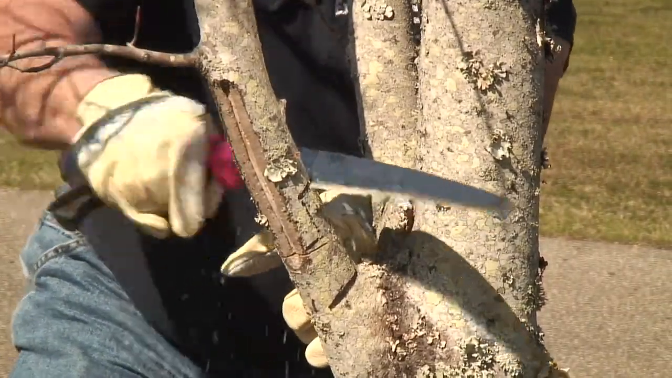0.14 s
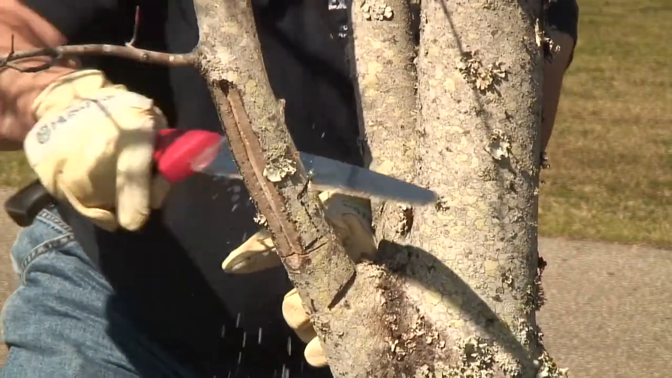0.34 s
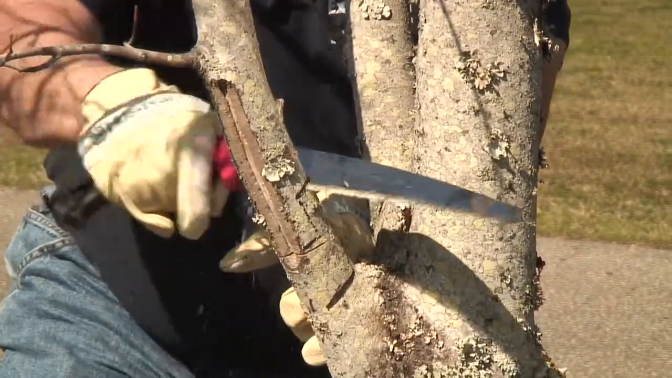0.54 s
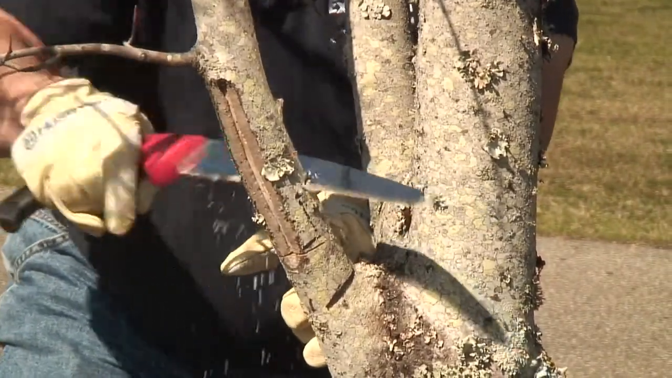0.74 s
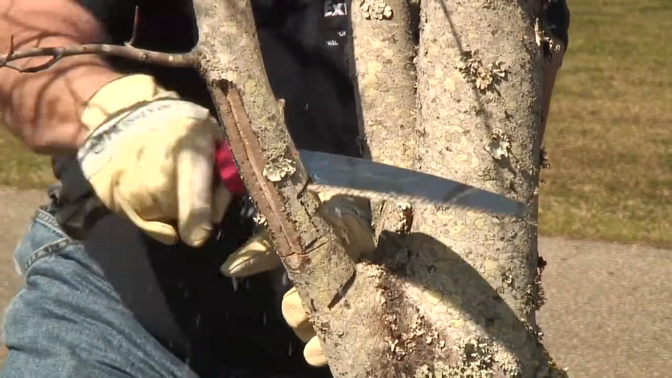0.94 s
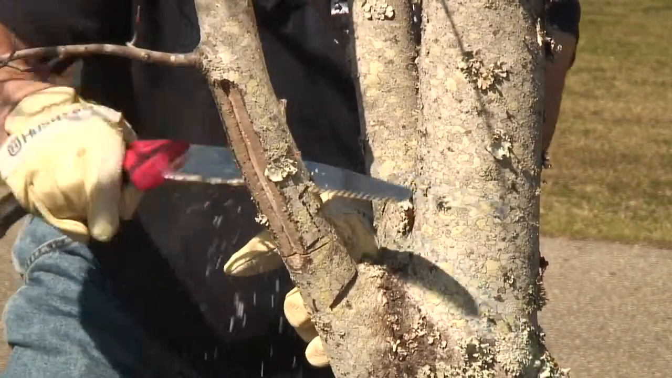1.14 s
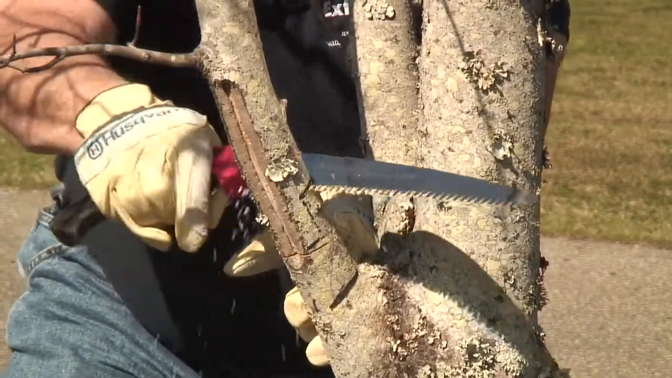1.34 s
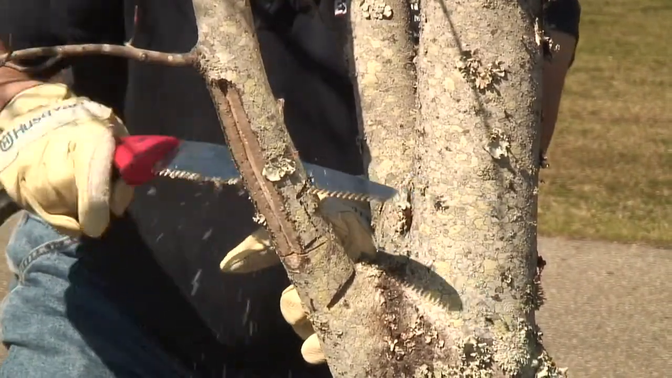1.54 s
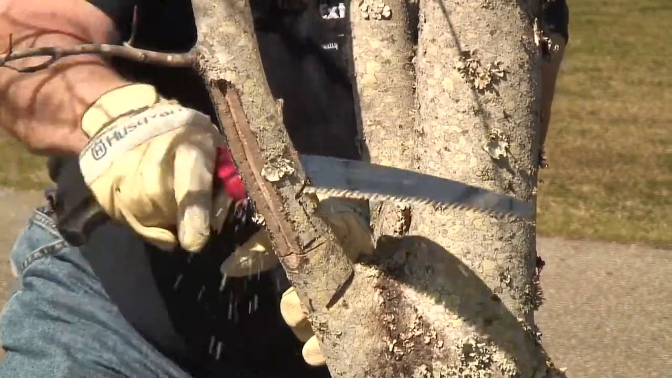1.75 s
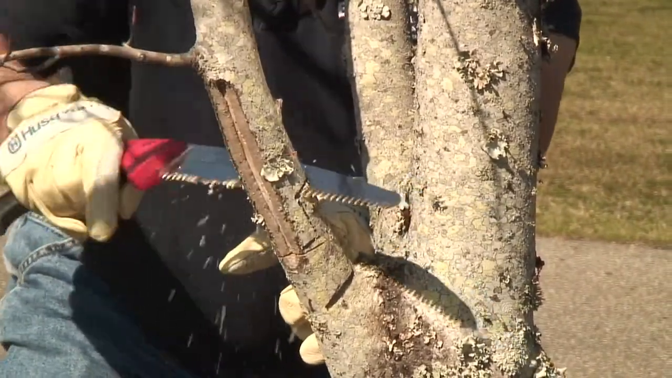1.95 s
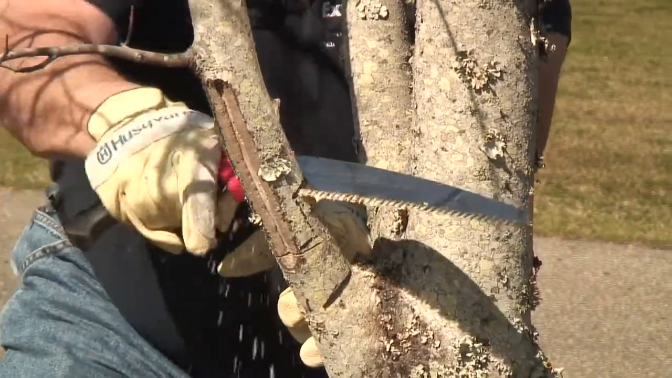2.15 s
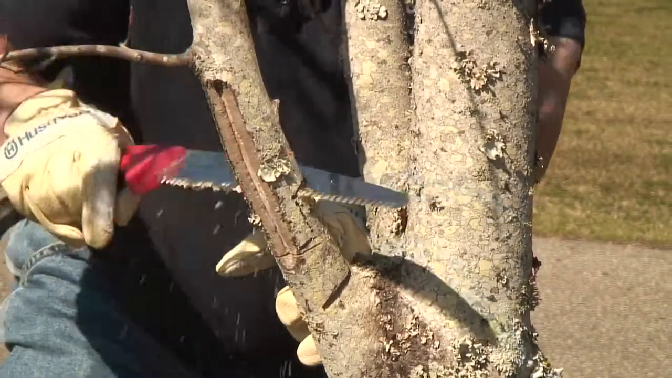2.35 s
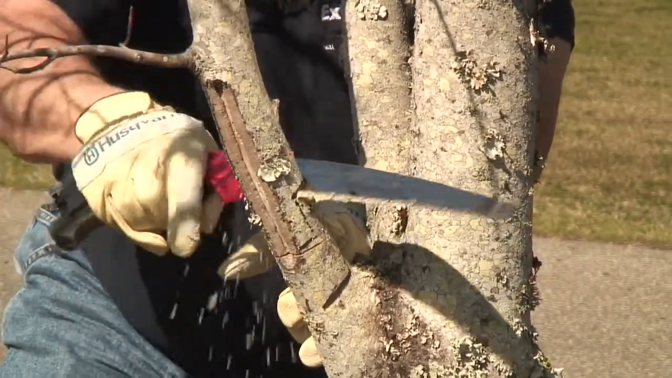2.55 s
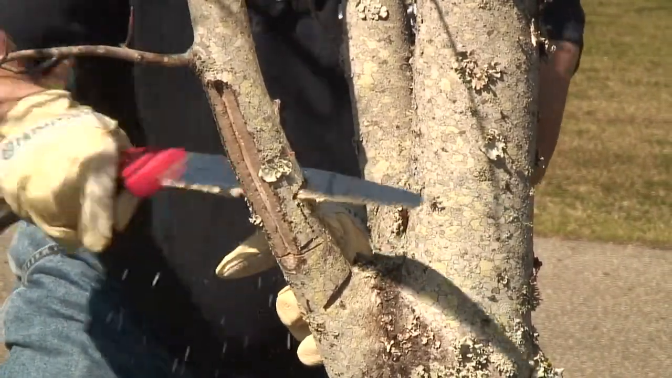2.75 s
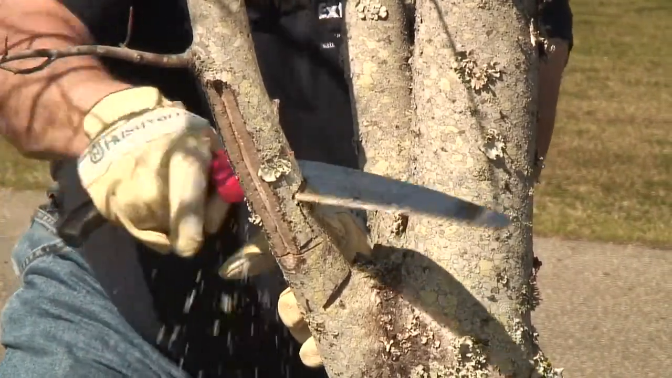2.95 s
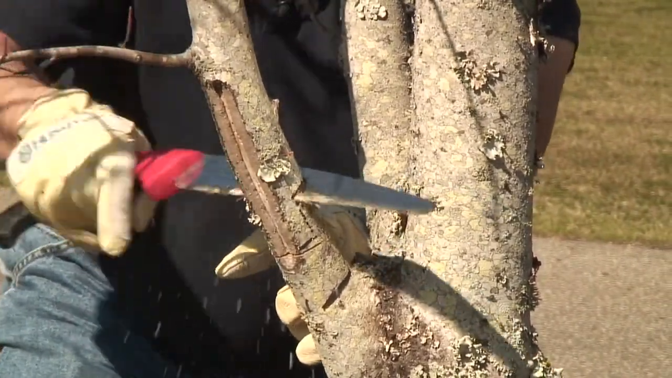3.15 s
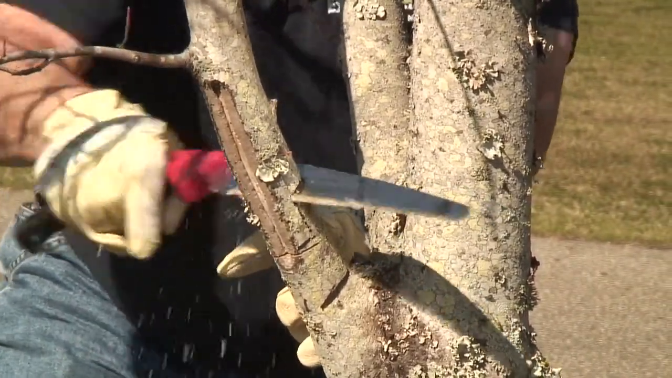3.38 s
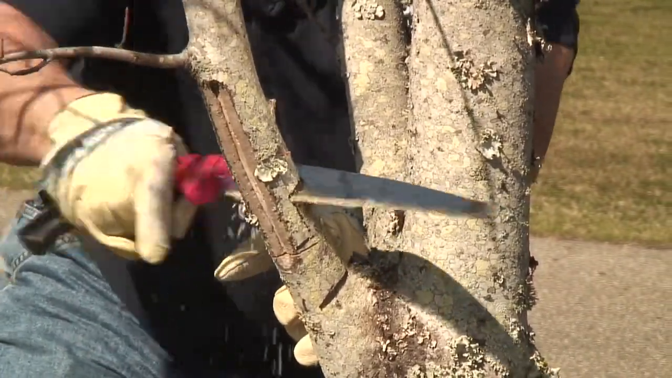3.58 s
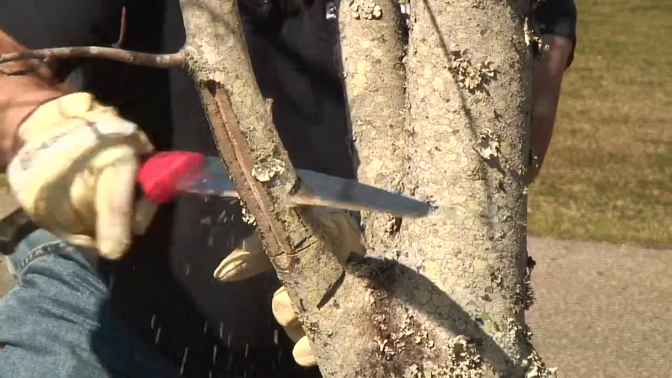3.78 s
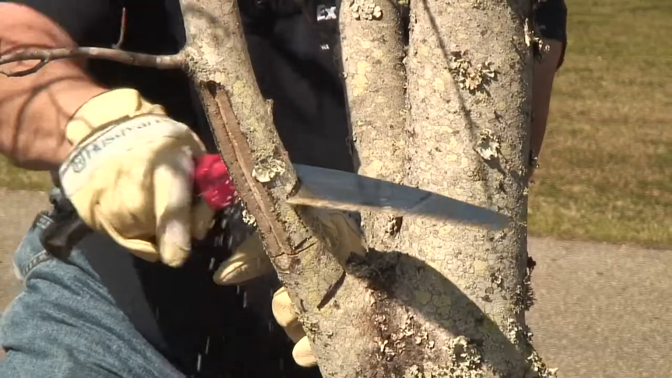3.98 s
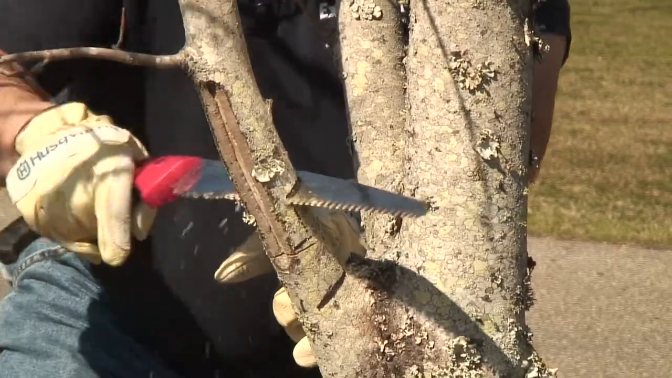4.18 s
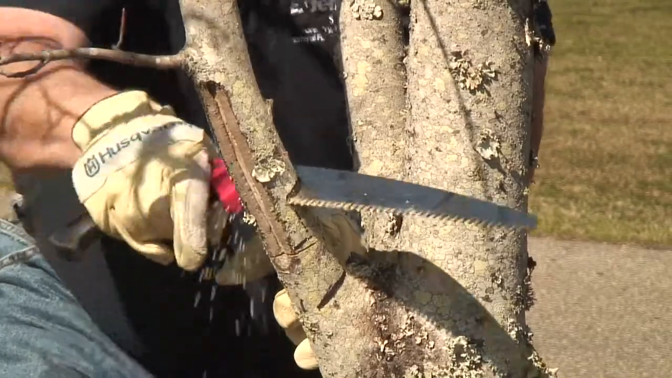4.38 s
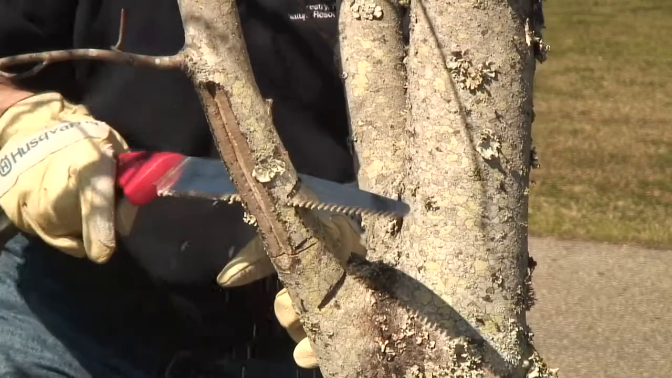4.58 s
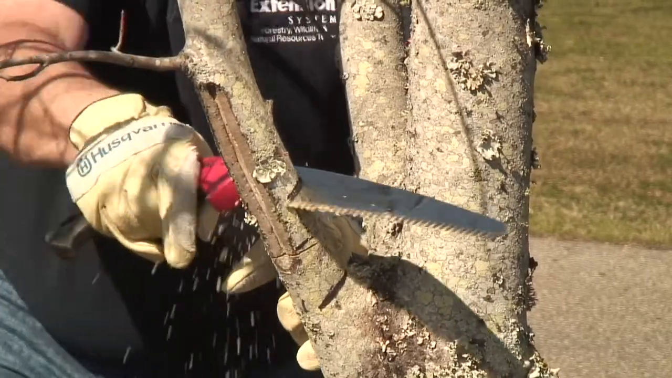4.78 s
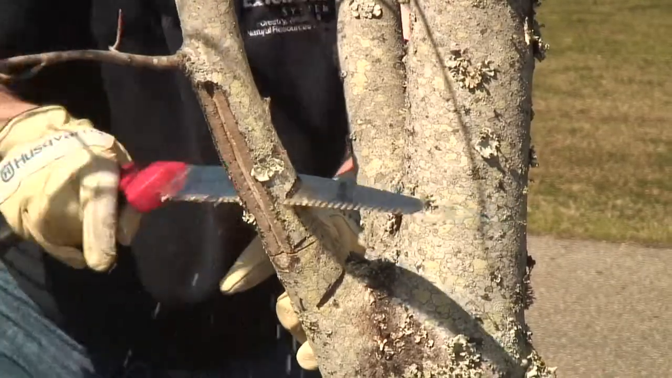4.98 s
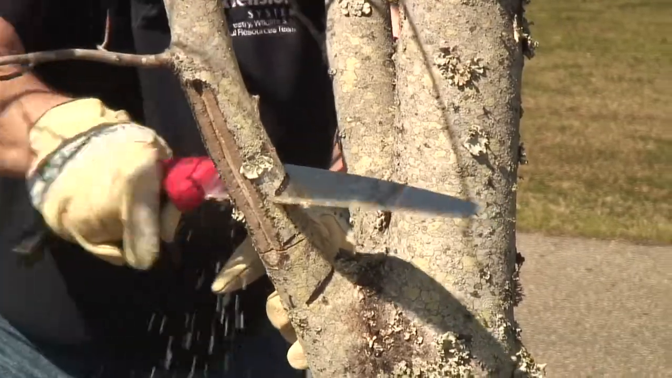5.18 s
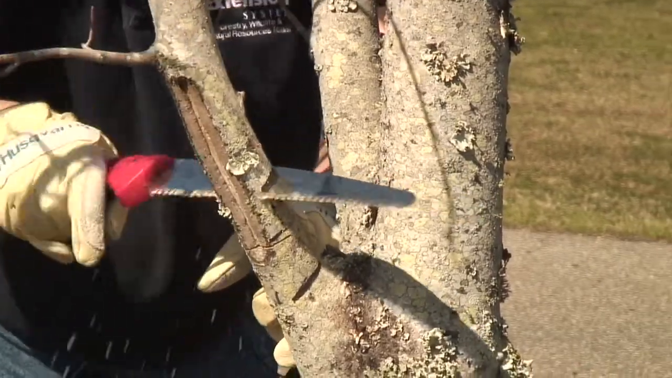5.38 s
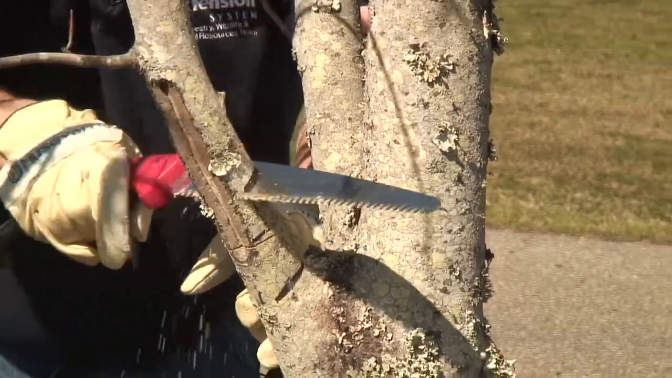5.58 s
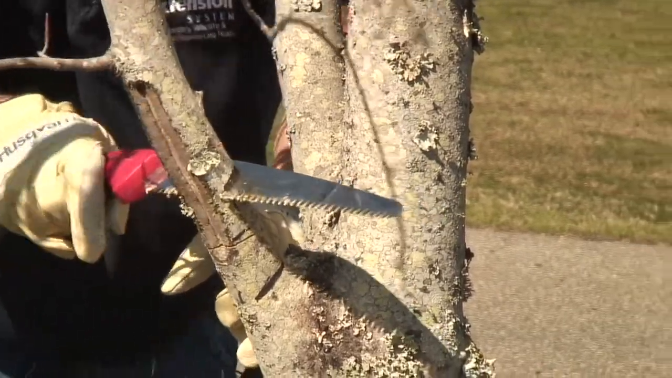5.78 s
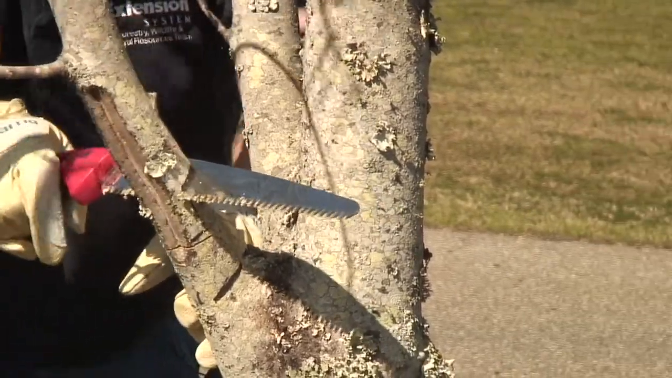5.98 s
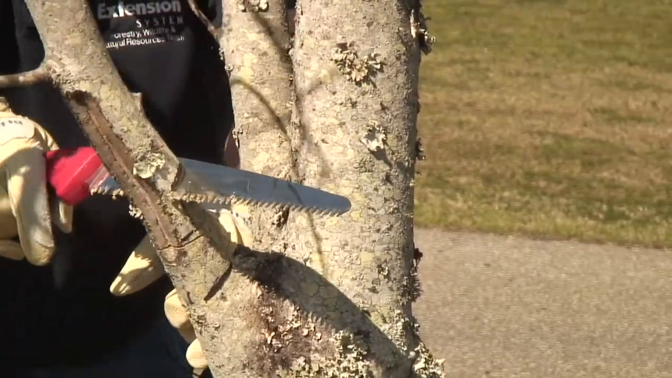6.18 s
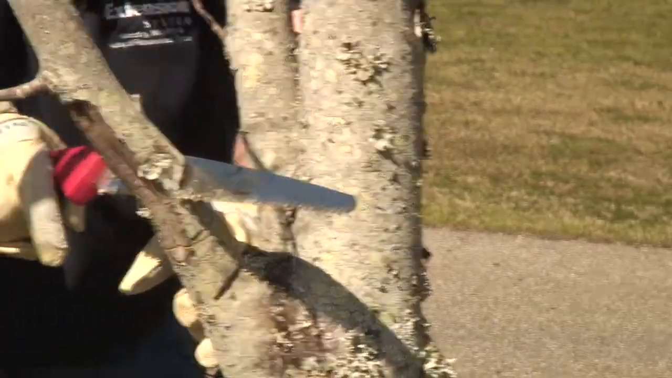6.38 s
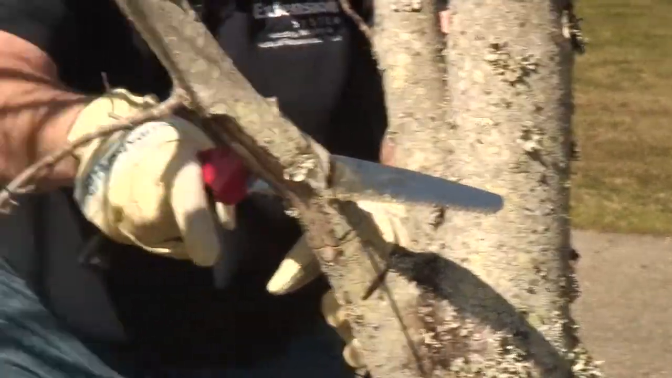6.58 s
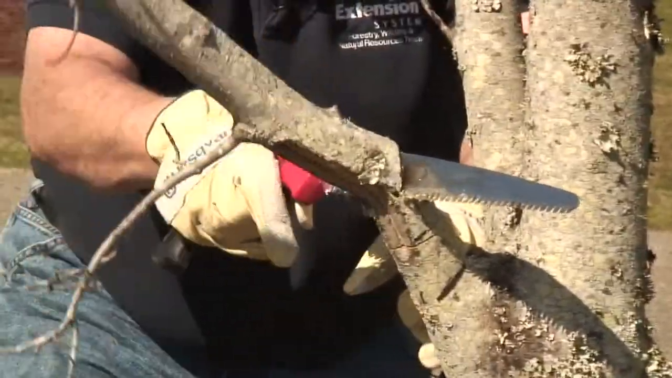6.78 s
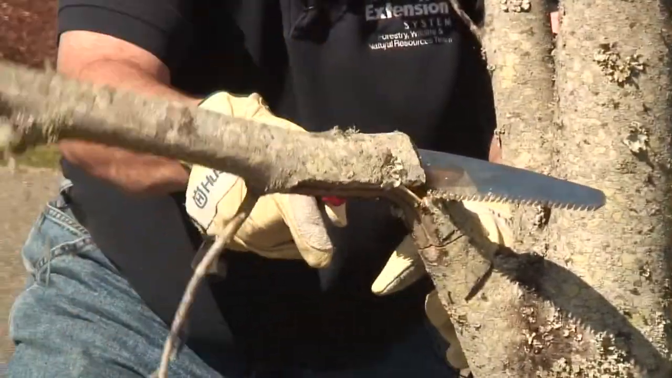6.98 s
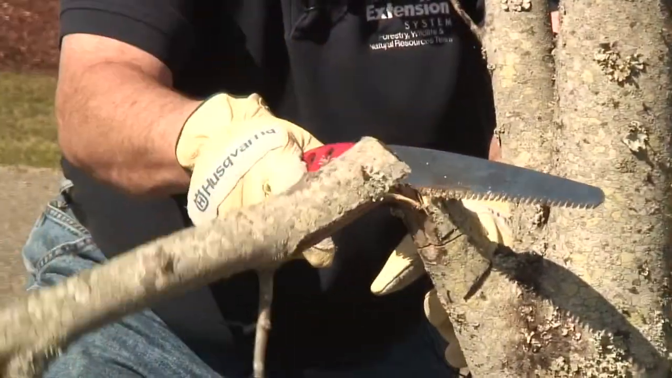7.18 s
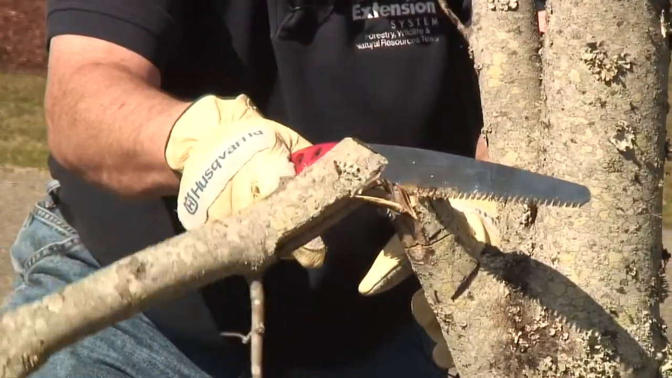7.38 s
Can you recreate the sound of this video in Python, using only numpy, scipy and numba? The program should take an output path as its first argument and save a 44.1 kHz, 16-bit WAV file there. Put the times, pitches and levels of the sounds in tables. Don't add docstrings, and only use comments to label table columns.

```python
import sys
import numpy as np
from scipy import signal
from scipy.fft import rfft, irfft
from scipy.io import wavfile
from scipy.ndimage import uniform_filter1d
from numba import njit

SR = 44100
rng = np.random.default_rng(int(sys.argv[2]) if len(sys.argv) > 2 else 0)


def file_out(sig):
    cols = np.atleast_2d(sig).T
    lim = np.clip(cols, -1, 1)
    pcm = np.round(lim * 32767).astype(np.int16)
    wavfile.write(sys.argv[1], SR, pcm)


def attenuation_scalar(level_db):
    decades = np.asarray(level_db, float) / 20
    return 10 ** decades


N = 327663


def unit(x):
    return x / np.sqrt(np.mean(x ** 2))


def colour(x, points):
    hz, db = np.transpose(points)
    grid = np.maximum(np.arange(1025) * SR / 2048, 1)
    log_gain = np.interp(np.log(grid), np.log(hz), db) * np.log(10) / 20
    cepstrum = irfft(log_gain)
    cepstrum[1:1024] *= 2
    cepstrum[1025:] = 0
    impulse = irfft(np.exp(rfft(cepstrum)))
    return signal.fftconvolve(x, impulse)[:len(x)]


@njit
def moving_band(x, hz, width):
    y, b, l = np.empty(len(x)), 0., 0.
    for i in range(len(x)):
        g, k = np.tan(np.pi * hz[i] / SR), width / hz[i]
        v = (b + g * (x[i] - l)) / (1 + g * (g + k))
        b, l, y[i] = 2 * v - b, l + 2 * g * v, k * v
    return y


def band(x, hz, width):
    return signal.lfilter(*signal.iirpeak(hz, hz / width, fs=SR), x)


def steep(x, hz, width):
    return band(band(x, hz, width), hz, width)


def walk(rate):
    step = 16
    hold = int(SR / step / rate) + 1
    coarse = np.repeat(rng.standard_normal(N // step // hold + 2), hold)
    slewed = uniform_filter1d(uniform_filter1d(coarse, hold), hold)
    return 1.3 * np.repeat(slewed, step)[:N]


def grains(scatter_db):
    size_db = scatter_db * np.minimum(rng.exponential(size=N), 5)
    return unit(rng.standard_normal(N) * attenuation_scalar(size_db))


# (start [s], end [s], tearing level [dB], knock level [dB])
PULL_STROKES = [(-0.06, 0.087, -35.5, -39.5), (0.324, 0.475, -32, -39.5), (0.713, 0.869, -33.5, -37),
                (1.103, 1.246, -31.5, -35.5), (1.484, 1.628, -32.5, -35.5), (1.869, 2.018, -35.5, -36),
                (2.241, 2.393, -36, -37.5), (2.624, 2.767, -33.5, -37.5), (3.012, 3.167, -35, -37.5),
                (3.397, 3.544, -35, -37.5), (3.772, 3.905, -32.5, -39), (4.141, 4.282, -36, -40.5),
                (4.499, 4.65, -31.5, -37.5), (4.865, 5.008, -33.5, -38), (5.236, 5.372, -35, -40),
                (5.594, 5.721, -49.5, -57)]
# (start [s], end [s], tearing level [dB], knock level [dB], limb shake level [dB])
PUSH_STROKES = [(0.134, 0.257, -34, -37.5, -61), (0.517, 0.651, -38, -38, -60),
                (0.91, 1.045, -38, -37.5, -54), (1.29, 1.422, -37, -36, -51.5), (1.67, 1.8, -36, -36, -62),
                (2.059, 2.183, -39, -34, -49.5), (2.433, 2.556, -38.5, -36.5, -53),
                (2.812, 2.941, -37, -38.5, -55), (3.207, 3.323, -37, -35, -48.5),
                (3.588, 3.714, -37.5, -37.5, -52), (3.956, 4.088, -38.5, -40, -52.5),
                (4.342, 4.451, -36, -38, -56), (4.7, 4.826, -38.5, -39.5, -58),
                (5.057, 5.19, -39.5, -40, -55.5), (5.426, 5.567, -42.5, -44.5, -56.5)]
# (time [s], rate [teeth/s])
PUSH_TOOTH_RATE = [(0.2, 332), (2.1, 394), (3.2, 390), (3.7, 340), (5.5, 310)]
# (time [s], pulling centre [Hz], pushing centre [Hz])
BRANCH_PITCH = [(0, 873, 1140), (2.5, 882, 1184), (4.2, 827, 1036), (5.5, 740.3, 879.3)]


def strokes():
    pull_tooth_hz, pull_shake_db = 288.2, -20
    pull_bite = 1.2
    t = np.arange(N) / SR
    tear, knock, shake, push = np.zeros(N), np.zeros(N), np.zeros(N), np.zeros(N)
    tooth_rate, branch_hz = np.full(N, 200.), np.full(N, 900.)
    depth_s, *centres = np.transpose(BRANCH_PITCH)
    rows = [(*row, row[3] + pull_shake_db, 0) for row in PULL_STROKES]
    rows += [(*row, 1) for row in PUSH_STROKES]
    for t0, t1, tear_db, knock_db, shake_db, pushing in rows:
        tear_rise, knock_rise = (1.4, 2) if pushing else (-0.3, -1)
        tooth_hz = np.interp(t0, *np.transpose(PUSH_TOOTH_RATE)) if pushing else pull_tooth_hz
        pad = 0.1 * (t1 - t0)
        on = (t > t0 - pad) & (t < t1 + pad)
        way = (t[on] - t0 + pad) / (t1 - t0 + 2 * pad)
        speed = np.sin(np.pi * way)
        tear[on] = speed ** 0.92 * attenuation_scalar(tear_db + 2 * tear_rise * way)
        knock_edge = 0.81 * (1 if pushing else pull_bite)
        knock[on] = speed ** knock_edge * attenuation_scalar(knock_db + 2 * knock_rise * (way - 0.5))
        shake[on] = speed ** 0.91 * attenuation_scalar(shake_db)
        tooth_rate[on] = tooth_hz * speed ** 0.25
        branch_hz[on] = np.interp(t0, depth_s, centres[pushing])
        push[on] = pushing
    return tear, knock, shake, tooth_rate, branch_hz, push


def teeth(hz, slip, scatter_db):
    phase = np.cumsum(hz * (1 + slip)) / SR
    hits = np.diff(np.floor(phase), prepend=0) > 0
    return hits * attenuation_scalar(scatter_db * rng.standard_normal(N)), phase % 1


# (centre [Hz], width [Hz], level [dB])
TRUNK_MODES = [(700, 240, -12), (1050, 40, -8.5), (1380, 2000, -24), (1860, 2000, -21)]


def branch(force, branch_hz):
    centre = uniform_filter1d(branch_hz, 300) * attenuation_scalar(0.81 * walk(30))
    body = moving_band(force, centre, 220.0)
    for hz, width, db in TRUNK_MODES:
        body += attenuation_scalar(db + 1.9 * walk(25.07)) * band(force, hz, width)
    high_pass = signal.butter(4, 380, "high", fs=SR, output="sos")
    return unit(signal.sosfilt(high_pass, body))


# (frequency [Hz], level [dB per Hz])
TEAR_TONE = [(900, -37), (1500, -17), (2100, -18), (2700, -15), (3500, -10.5), (4400, -13.5), (5500, -8.5),
             (6200, 2), (6700, -8), (7500, -17), (9200, -7.5), (11000, -11.5), (13500, -21), (16000, -35.5)]


def torn_fibre(phase, push):
    t = np.arange(N) / SR
    tooth_pulse = 1 + 0.19 * np.cos(2 * np.pi * phase)
    fibre = grains(scatter_db=2.15) * tooth_pulse * attenuation_scalar(0.72 * walk(45) + 1.34 * walk(160))
    fibre = unit(colour(fibre, TEAR_TONE))
    patches = (1800, 2330, 3000, 3380, 4450, 5350, 8620, 10640)
    fibre += sum(0.52 * walk(30) * band(fibre, hz, 0.19 * hz) for hz in patches)
    fibre += np.where(push, -0.2, 0.2) * band(fibre, 11000, 6200)
    wall_db = -4 + 0.9 * t
    fibre += (attenuation_scalar(wall_db) - 1) * band(fibre, 3800, 1300)
    tip_db = -0.8 - 3.5 * np.exp(-(t / 0.76) ** 2)
    fibre += (attenuation_scalar(tip_db) - 1) * band(fibre, 10200, 4500)
    return fibre


def saw():
    tear, knock, shake, tooth_rate, branch_hz, push = strokes()
    slip = np.where(push, 0.055, 0.25) * walk(200) + 0.02 * walk(40)
    hits, phase = teeth(tooth_rate, slip, scatter_db=3.0)
    force = unit(uniform_filter1d(hits, size=14)) * attenuation_scalar(1.3 * walk(30))
    force += np.where(push, 2.4, 4.0) * grains(scatter_db=1.5)
    body = branch(force, branch_hz)
    limb = unit(steep(force, 370, 400)) * shake
    fibre = torn_fibre(phase, push)
    linger = 0.16
    tear = np.hypot(tear, linger * attenuation_scalar(2.0 * walk(9)) * uniform_filter1d(tear, size=5000))
    knock = np.hypot(knock, linger * attenuation_scalar(5.7 * walk(8.9)) * uniform_filter1d(knock, size=5000))
    rasp = fibre * tear * attenuation_scalar(-1.0)
    knocks = body * knock * attenuation_scalar(0.5 + 1.45 * walk(35))
    return rasp + knocks + limb * attenuation_scalar(2.2 * walk(22))


# (frequency [Hz], level [dB per Hz])
TRAFFIC_TONE = [(20, -4), (60, -13.5), (150, -9.5), (220, -9.5), (310, -4.5), (430, -5), (800, -1),
                (1100, -5), (1700, -9.5), (2500, -10.5), (5000, -13.5), (10000, -17.5), (14800, -17.5),
                (15600, -46)]
# (time [s], level [dB])
WIND_LEVEL = [
    (0, -70),
    (2.2, -68),
    (4.5, -67.5),
    (5.4, -68),
    (6.1, -80),
    (7.0, -72),
    (7.33, -68),
    (7.43, -70),
]


def air():
    t = np.arange(N) / SR
    traffic = unit(colour(rng.standard_normal(N), TRAFFIC_TONE)) * attenuation_scalar(-54 + 0.27 * walk(2.4))
    whine_hz, t0, t1, whine_db = 2471, 6.0, 6.52, -64
    passing = np.sin(np.pi * np.clip((t - t0) / (t1 - t0), 0, 1)) ** 0.3
    whine = passing * np.sin(2 * np.pi * whine_hz * t) * attenuation_scalar(whine_db + 3.5 * walk(14))
    rumble = unit(band(rng.standard_normal(N), 29, 51))
    wind = rumble * attenuation_scalar(np.interp(t, *np.transpose(WIND_LEVEL)) + 1.8 * walk(12))
    return traffic + whine + wind


# (start [s], end [s], crest after start [s], top pitch [Hz], level [dB])
BLADE_SINGS = [
    (0.207, 0.37, 0.075, 1445, -48),
    (0.659, 0.761, 0.053, 1480, -57),
    (1.14, 1.26, 0.04, 1454, -46),
    (1.6, 1.749, 0.08, 1496, -47.5),
    (2.02, 2.114, 0.065, 1432, -46),
    (2.554, 2.644, 0.048, 1399, -48.5),
]


def blade():
    out, wobble = np.zeros(N), 0.0097 * walk(300)
    rows = [(*row, 42) for row in BLADE_SINGS]
    rows.append((6.99, 7.038, 0.018, 6800, -63, -45))
    for t0, t1, crest, hz, db, arch in rows:
        way = np.linspace(-1, 1, int((t1 - t0) * SR))
        start = int(t0 * SR)
        span = slice(start, start + len(way))
        flex = np.linspace(0, t1 - t0, len(way)) - crest
        pitch = hz * (1 - arch * flex ** 2) * (1 + wobble[span])
        tone = np.sin(2 * np.pi * np.cumsum(pitch) / SR)
        out[span] += attenuation_scalar(db + 4.0) * (1 - way ** 4) * tone
    return out * attenuation_scalar(1.4 + 0.89 * walk(60))


# (start [s], end [s], centre [Hz], width [Hz], level [dB])
BLADE_BINDS = [
    (2.02, 2.054, 1750, 200, -51),
    (4.448, 4.485, 2250, 450, -43.5),
    (4.796, 4.808, 1910, 700, -50),
    (4.929, 4.95, 3480, 399, -39),
    (5.01, 5.055, 1800, 600, -46),
    (3.222, 3.26, 564, 250, -41),
]


def binds():
    t = np.arange(N) / SR
    rub = grains(scatter_db=4.0) * attenuation_scalar(1.4 * walk(200))
    out = np.zeros(N)
    for t0, t1, hz, width, db in BLADE_BINDS:
        pinch = np.sin(np.pi * np.clip((t - t0) / (t1 - t0), 0, 1)) ** 0.5
        out += pinch * unit(steep(rub, hz, width)) * attenuation_scalar(db)
    return out


# (centre [Hz], width [Hz])
SPLIT_MODES = [(3700, 1300), (6200, 1670), (9300, 3300), (12000, 4500)]
# (time [s], level [dB])
CRACKLE_LEVEL = [
    (6.3, -78),
    (6.5, -57.5),
    (6.8, -58.5),
    (6.95, -59),
    (7.06, -68),
    (7.24, -51),
    (7.315, -42.5),
    (7.37, -49),
    (7.43, -49),
]
# (time [s], level [dB])
TWIG_BRUSHES = [
    (6.65, -59),
    (7.26, -45),
    (7.29, -49),
    (7.32, -49.5),
]


def fall():
    t = np.arange(N) / SR
    brush = np.zeros(N)
    for s, db in TWIG_BRUSHES:
        brush += attenuation_scalar(db) * np.exp(np.minimum((t - s) / 0.011, (s - t) / 0.031))
    splinters = grains(scatter_db=3.5) * attenuation_scalar(3.8 * walk(150))
    crackle = attenuation_scalar(-2) * band(splinters, 4800, 4705)
    for db, (hz, width) in zip((-2.0, -9, -11, -37), SPLIT_MODES):
        crackle += attenuation_scalar(db) * steep(splinters, hz, width)
    rustle = steep(grains(scatter_db=0.0), 650, 560) * attenuation_scalar(5.2 * walk(90))
    opening = attenuation_scalar(np.interp(t, *np.transpose(CRACKLE_LEVEL)))
    return unit(crackle) * opening + unit(rustle) * brush


# (time [s], level [dB], brightness [dB per mode])
SMALL_SPLITS = [(6.3604, -49.5, -3.5), (6.4041, -64, 5.5), (6.5742, -40, -2.5), (6.6002, -42.5, -0.4),
                (6.653, -40, 0), (6.6874, -44.5, -0.3), (6.704, -51, -3), (6.7426, -47.5, 3.5),
                (6.78, -45, -1.5), (6.7916, -42, -3), (6.8101, -50, -4), (6.835, -49, -2.5),
                (6.8507, -51, 0.6), (6.866, -47, -2.3), (6.908, -47, -5), (6.915, -42, -5),
                (6.9238, -51, -0.3), (6.9877, -53, -0.5), (7.0176, -57, -4.5), (7.108, -44, 1.6),
                (7.1227, -47, -1), (7.1548, -47, 2.5), (7.1585, -50, 3), (7.2046, -42, 0),
                (7.2252, -44.5, 0.5), (7.2368, -41, -16), (7.2546, -49.5, -1.2), (7.3518, -48, 2.5),
                (7.3988, -40, -12), (7.416, -45, -9)]
# (time [s], level [dB], brightness [dB per mode], middle mode level [dB])
LOUD_SNAPS = [(6.499, -21.5, -4.5, -5), (6.6139, -25.5, -2, -4), (6.6346, -24, 5.5, -1.5),
              (6.8899, -26.5, 3, 0.5), (6.9382, -32, 3, 0), (7.084, -37.5, 4.5, 0.4),
              (7.0915, -21, 1.5, 0.8), (7.1028, -39, 1.5, -1), (7.1875, -40.5, -2, 7),
              (7.2692, -32, 2, 6.5), (7.314, -35.5, -7, -5), (7.335, -44.5, 2.3, 14.5),
              (7.358, -36, -4, -9), (7.4098, -35, -8, -7)]


def cracks():
    rise_s, snap_s, tail_s, tail_db = 0.00013, 0.00063, 0.0044, -24
    echo_s, echo_db = 0.0098, -26
    out, t = np.zeros(N + 2048), np.arange(2048) / SR
    attack = (t / rise_s) ** 2 / (1 + (t / rise_s) ** 2)
    shape = attack * (np.exp(-t / snap_s) + attenuation_scalar(tail_db) * np.exp(-t / tail_s))
    low_hz, low_width = SPLIT_MODES[0]
    for s, db, bright_db, middle_db in LOUD_SNAPS + [(*row, 0) for row in SMALL_SPLITS]:
        burst = rng.standard_normal(len(t)) * shape
        burst[4] += 1.9
        mode_db = db + bright_db * np.arange(4) + [0, middle_db, 0, -11]
        peak_db = max(mode_db)
        sag_hz = 30 * min(bright_db, 0) - 300 * (s > 7.38)
        modes = [(low_hz + sag_hz, low_width)] + SPLIT_MODES[1:]
        narrow = 0.62 if peak_db < -33 else 1
        ring = np.zeros(len(t))
        for level_db, (hz, width) in zip(mode_db, modes):
            ring += attenuation_scalar(level_db) * unit(steep(burst, hz, width * narrow))
        thud_db = -13 + 0.35 * (peak_db + 6.0)
        ring += attenuation_scalar(peak_db + thud_db) * unit(steep(burst, 2400, 3700))
        ring += attenuation_scalar(peak_db - 25) * unit(steep(burst, 1100, 1800))
        start = int(s * SR)
        out[start:start + len(t)] += attenuation_scalar(-12.0) * ring
    lag = int(echo_s * SR)
    out[lag:] += attenuation_scalar(echo_db) * uniform_filter1d(out, size=3)[:-lag]
    return out[:N]


def scene():
    mono = saw() + air() + blade() + binds() + fall() + cracks()
    return np.array([mono, mono])


def top_cut(x):
    return signal.sosfilt(signal.butter(12, 17040, fs=SR, output="sos"), x)


def record(dry):
    low_pass = signal.ellip(8, 0.2, 70, 16400, fs=SR, output="sos")
    mix = signal.sosfilt(low_pass, dry)
    return top_cut(mix)


dry = scene()
out = record(dry)
file_out(out)
```